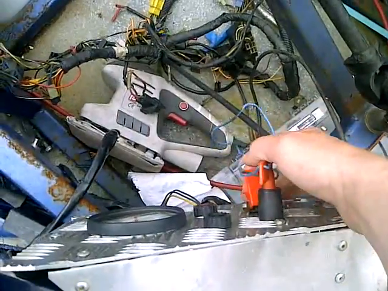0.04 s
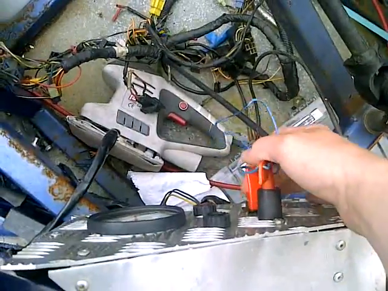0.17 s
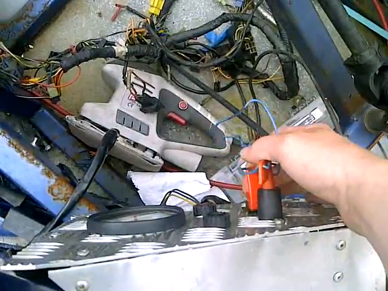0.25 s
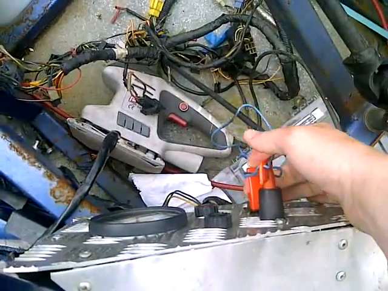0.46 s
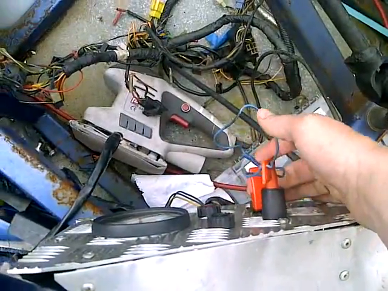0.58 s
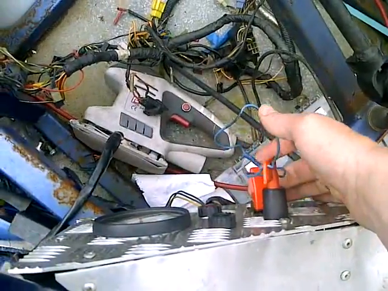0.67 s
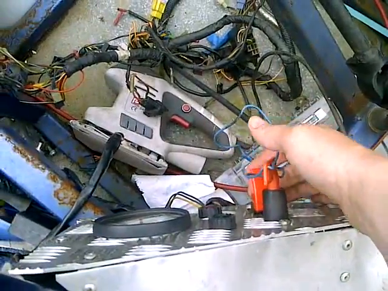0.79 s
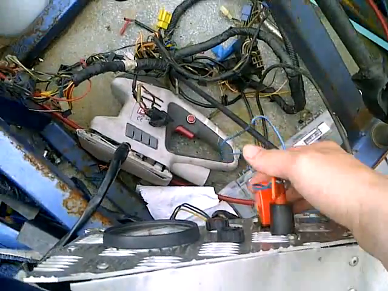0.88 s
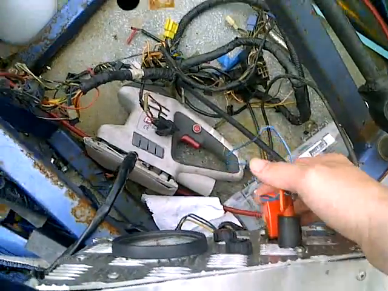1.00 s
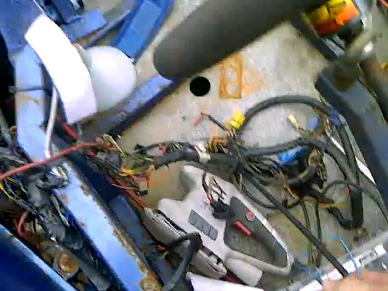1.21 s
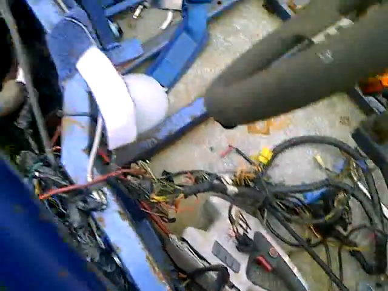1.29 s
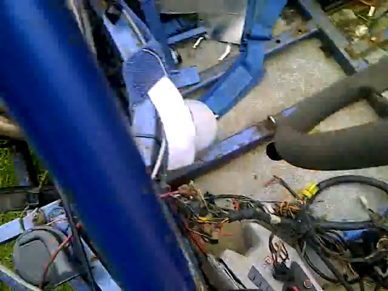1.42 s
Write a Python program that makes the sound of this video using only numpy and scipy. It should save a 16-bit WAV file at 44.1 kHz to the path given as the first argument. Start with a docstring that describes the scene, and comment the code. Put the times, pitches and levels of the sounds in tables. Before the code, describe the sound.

A stiff switch snaps hard, then clicks more lightly, over a low hiss.

```python
"""A few soft handling bumps over a steady low hiss, then a hand throws a stiff switch on a
vehicle's metal dash panel: a small tick and a hard snap that bounces, then a lighter second click.
Each blow rings the switch and the panel and dies away in the cabin.
Heard from inside the vehicle, on one microphone."""
import sys
import numpy as np
from scipy import signal
from scipy.fft import rfft, irfft
from scipy.io import wavfile

SR = 44100
rng = np.random.default_rng(int(sys.argv[2]) if len(sys.argv) > 2 else 0)


def store_pcm(level_fs):
    """Save levels as 16-bit WAV."""
    pcm = np.round(np.clip(level_fs, -1, 1) * 32767).astype(np.int16)
    wavfile.write(sys.argv[1], SR, np.atleast_2d(pcm).T)


N = 63945

# steady hiss at the microphone: frequency_hz, density_db
HISS_SPECTRUM = [(20, -34), (47, -19), (64, 0.5), (100, -7), (180, -2), (300, 0), (600, 1.5), (1100, 0.5),
                 (1700, -5), (2400, -17.5), (3300, -19), (5000, -17), (7200, -18.5), (8200, -31),
                 (9000, -51)]
# course of the low rumble: time_s, level_db
RUMBLE_LEVELS = [(0, -61.5), (.17, -54.5), (.22, -72), (.4, -93), (1.45, -80)]
# tone of the rumble: frequency_hz, density_db
RUMBLE_SPECTRUM = [(15, -11), (40, 10), (120, 11.5), (300, 0.5), (600, -41)]
# soft handling bumps: start_s, level_db, pitch_hz, t60_s, scuff_share
HANDLING_BUMPS = [(0.012, -36, 156, 0.029, 0.3), (0.058, -29, 130, 0.039, 0.58),
                  (0.138, -36.5, 130, 0.031, 0.01), (0.169, -42, 218, 0.057, 0.36),
                  (1.135, -48.5, 250.2, 0.39, 0.4), (1.151, -47, 348, 0.18, .6)]
# blows of the switch: start_s, level_db, bass_db, treble_db, ring_factor, stroke
SWITCH_BLOWS = [(0.2302, -9, -25.5, -1, 0.84, "throw"), (0.2356, -.5, 0.5, -2, 0.98, "throw"),
                (0.2463, -13.5, -14, -4, 0.93, "throw"), (0.6452, -9.5, -2, 1, 0.95, "return"),
                (0.6510, -17, -3.5, -1, 0.91, "return")]
# modes of switch and dash panel: pitch_hz, t60_s, throw_db, return_db
PANEL_MODES = [(341, 0.36, -63, -42), (393.5, .2, -37.5, -52), (433.2, 0.15, -37.5, -35.5),
               (540.6, .22, -33, -47), (592, 0.18, -29.5, -28.5), (635.8, 0.12, -30, -28),
               (837, 0.067, -33.5, -42), (945.7, 0.083, -28, -29), (982, 0.34, -40.5, -58),
               (1149, 0.17, -43, -63), (1648, 0.078, -32, -37), (2710, 0.11, -36, -33.5),
               (2914, 0.046, -31, -30.5), (3024, 0.056, -40, -28), (3870, 0.062, -46, -45),
               (4085, 0.037, -33, -48), (4670, 0.067, -33, -55), (5090, 0.037, -36, -47),
               (5290, .04, -34, -43), (7250, 0.07, -39.5, -41.5)]
# dense clatter of the housing: frequency_hz, throw_density_db, return_density_db
HOUSING_SPECTRUM = [(150, -24, -18), (300, -22, -5.5), (563, -9, 0), (750, -8, -11), (1000, 1, -12),
                    (1250, -1, 0.5), (1950, -4, -3), (2230, -12, -11), (2800, -5.5, -2.5),
                    (3600, -9.5, -6.5), (4400, -8, -11.5), (5370, -8.5, -8.5), (5820, -14.5, -16.5),
                    (6700, -13.5, -6.5), (7260, -19, -12), (8020, -32, -18), (8760, -41, -34)]
# tail in the cabin: frequency_hz, density_db
CABIN_SPECTRUM = [(120, -13.5), (330, 0), (600, 3), (1100, -4.5), (2200, -11.5), (3000, -14), (5200, -14.5),
                  (7200, -22), (9000, -45)]

STROKES = ("throw", "return")
BASS_HZ, MID_HZ, TREBLE_HZ = 550, 1480, 7100  # where a blow's tone is set
MODES_DB, CLATTER_DB, CABIN_DB = 2, -21.5, -36  # balance within a blow
HISS_DB, TOP_HZ = -53.5, 8950
BASS_LAG_CYCLES = 0.28  # low bands take longer to build up


def undb(db):
    """Decibels to gain."""
    return 10 ** (np.asarray(db) / 20)


def colour(points, hz):
    """Gain at hz of a spectrum of (frequency_hz, level_db) points."""
    points_hz, db = np.array(points, float).T
    return undb(np.interp(np.log(np.maximum(hz, 1)), np.log(points_hz), db))


def noise(points):
    """Noise of rms 1 with the given spectrum."""
    hz = np.fft.rfftfreq(N, 1 / SR)
    phases = np.exp(2j * np.pi * rng.random(len(hz)))
    shaped = irfft(colour(points, hz) * phases, N)
    return shaped / shaped.std()


def since(start):
    """Seconds since a moment, zero before it."""
    return np.maximum(np.arange(N) / SR - start, 0)


def ring(age, rise_s, t60_s):
    """Envelope with a quick rise and an exponential decay."""
    return (1 - np.exp(-age / rise_s)) * np.exp(-np.log(1000) * age / t60_s)


def wash(age, points, tone, rise_s, t60_1khz_s, slope):
    """Overlapping resonances as half-octave noise bands; the high ones rise sooner and die faster."""
    centres = 100 * 2 ** (np.arange(14) / 2)
    bin_hz = np.fft.rfftfreq(N, 1 / SR)
    band_position = np.interp(np.log(bin_hz + 1), np.log(centres), np.arange(len(centres)))
    spectrum, out = rfft(noise(points)), 0
    for k, hz in enumerate(centres):
        band = irfft(spectrum * np.maximum(1 - abs(band_position - k), 0), N)
        t60_s = t60_1khz_s * (1000 / hz) ** slope
        out += colour(tone, hz) * band * ring(age, rise_s + BASS_LAG_CYCLES / hz, t60_s)
    return out


def hiss():
    """Steady background, strongest below 2 kHz."""
    return undb(HISS_DB) * noise(HISS_SPECTRUM)


def rumble():
    """A faint low rumble that falls away just before the snap."""
    times_s, levels_db = np.array(RUMBLE_LEVELS).T
    return undb(np.interp(since(0), times_s, levels_db)) * noise(RUMBLE_SPECTRUM)


def handling():
    """Dull bumps, part low resonance and part scuff."""
    out = 0
    for start, db, hz, t60_s, scuff_share in HANDLING_BUMPS:
        age = since(start)
        resonance = np.sin(2 * np.pi * hz * age)
        scuff = noise([(hz / 4, -40), (hz / 2, -8.5), (hz, 0), (hz * 2, -8.5), (hz * 4, -60)])
        thud = np.sqrt(1 - scuff_share) * resonance + np.sqrt(scuff_share / 2) * scuff
        out += undb(db) * ring(age, rise_s=0.002, t60_s=t60_s) * thud
    return out


def panel_ring(age, spot, tone, ring_factor):
    """The struck switch and metal panel ring in decaying modes of alternating sign."""
    out = 0
    for k, (hz, t60_s, *levels_db) in enumerate(PANEL_MODES):
        gain = (-1) ** k * undb(levels_db[spot]) * colour(tone, hz)
        envelope = ring(age, rise_s=0.0013, t60_s=t60_s * ring_factor)
        out += gain * np.sin(2 * np.pi * hz * age) * envelope
    return out


def switch():
    """Each blow rings the panel, rattles the housing and leaves a short tail in the cabin."""
    out = 0
    for start, db, bass_db, treble_db, ring_factor, stroke in SWITCH_BLOWS:
        age = since(start)
        spot = STROKES.index(stroke)  # throw and return strike different spots
        tone = [(BASS_HZ, bass_db), (MID_HZ, 0), (TREBLE_HZ, treble_db)]
        modes = panel_ring(age, spot, tone, ring_factor)
        housing = [(hz, levels_db[spot]) for hz, *levels_db in HOUSING_SPECTRUM]
        clatter = wash(age, housing, tone, rise_s=0.00022, t60_1khz_s=0.068 * ring_factor, slope=0.096)
        cabin = wash(age, CABIN_SPECTRUM, tone, rise_s=0.008, t60_1khz_s=0.37, slope=0.28)
        out += undb(db) * (undb(MODES_DB) * modes + undb(CLATTER_DB) * clatter + undb(CABIN_DB) * cabin)
    return out


def scene():
    """Background, handling and switch at one microphone in the cabin."""
    return (hiss() + rumble() + handling() + switch())[None]


def record(dry):
    """The recorder cuts the top steeply."""
    return signal.sosfilt(signal.ellip(10, .2, 80, TOP_HZ, fs=SR, output="sos"), dry)


dry = scene()
out = record(dry)
store_pcm(out)
```